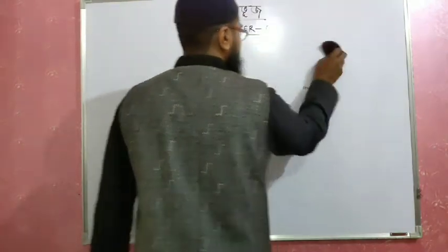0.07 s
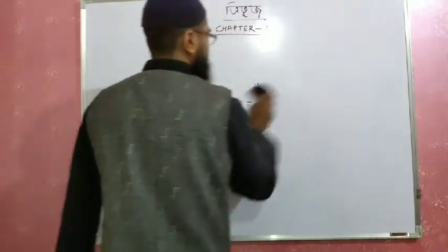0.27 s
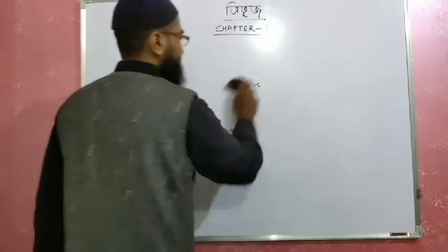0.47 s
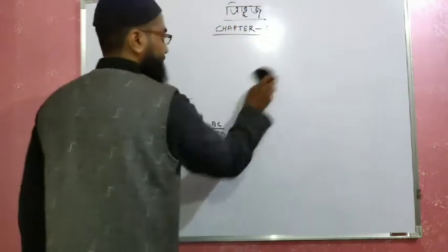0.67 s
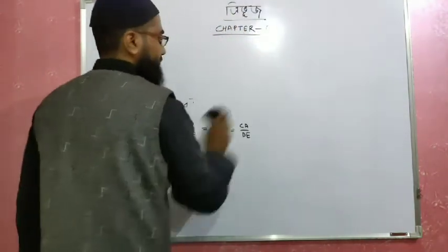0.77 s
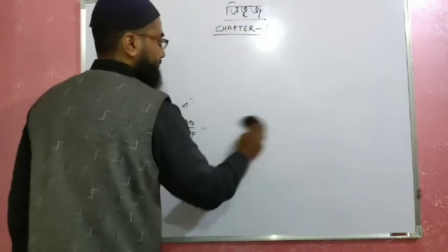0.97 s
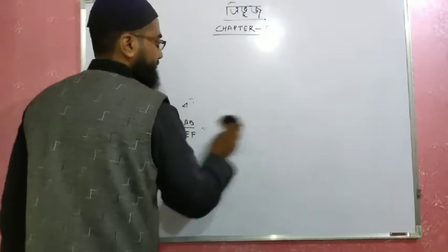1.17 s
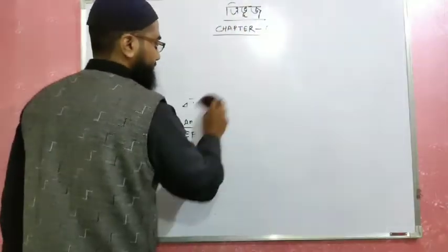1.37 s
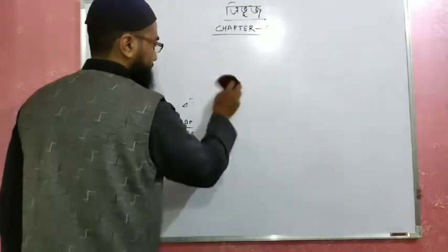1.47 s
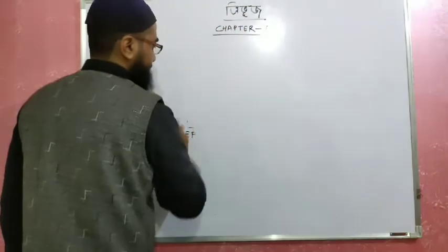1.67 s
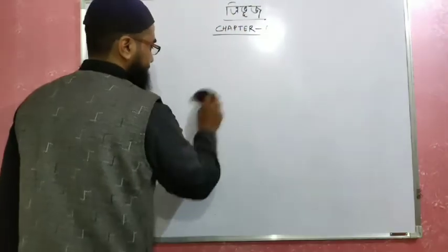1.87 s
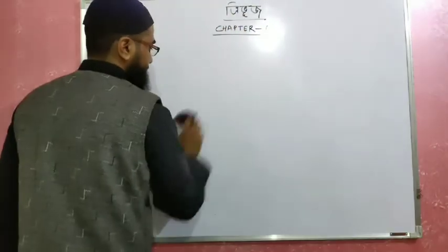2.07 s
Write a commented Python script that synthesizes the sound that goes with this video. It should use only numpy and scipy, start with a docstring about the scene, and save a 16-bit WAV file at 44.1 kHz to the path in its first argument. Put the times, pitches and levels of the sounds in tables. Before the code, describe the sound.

Brisk dry swishes of a duster on a whiteboard over low panel thuds; a sharp double knock early, strongest rub soon after, then fainter rubbing with a tiny tick, in a quiet small classroom.

```python
"""Felt duster on a whiteboard

A felt duster is swept to and fro over a wall-mounted whiteboard in a small classroom.
Coloured noise hisses with each stroke and drives the low panel modes; pulses on a modal bank knock
and chatter, most of all in the first second. Faint squeaks, two ticks and a short room tail are added.
The phone's noise suppressor passes the middle of the range only when it is strong; a faint hush remains.
"""
import sys
import numpy as np
from scipy import signal
from scipy.fft import rfft, irfft, next_fast_len
from scipy.io import wavfile
from scipy.ndimage import uniform_filter1d

SR = 44100
rng = np.random.default_rng(int(sys.argv[2]) if len(sys.argv) > 2 else 0)


def decibels_to_gain(level_db):
    """Convert a level in decibels to a linear amplitude gain (20 dB per decade)."""
    exponent = np.asarray(level_db, float) / 20
    return 10 ** exponent


def materialize(psi):
    """Save the field psi as 16-bit PCM at rate SR to the path in sys.argv[1].

    A 1-D psi becomes a single channel; in a 2-D psi each row is a channel.
    """
    bounded = np.clip(np.atleast_2d(psi).T, -1, 1)
    quanta = np.round(bounded * 32767).astype(np.int16)
    wavfile.write(sys.argv[1], SR, quanta)


N = 93271


def col(table, k):
    """Column k of a table."""
    return np.array(table, float)[:, k]


def curve(table, k):
    """Column k interpolated over time, one value per sample."""
    return np.interp(np.arange(N) / SR, col(table, 0), col(table, k))


def unit(x):
    """Scale to unit rms."""
    return x / np.sqrt(np.mean(x ** 2))


def noise():
    """White noise of the scene's length."""
    return rng.standard_normal(N)


def smooth(x, size):
    """Two moving averages in cascade."""
    return uniform_filter1d(uniform_filter1d(x, size), size)


def butter(x, order, hz, kind):
    """Causal Butterworth filter."""
    return signal.sosfilt(signal.butter(order, hz, kind, fs=SR, output="sos"), x)


def on_hz(table, hz):
    """Spectrum table interpolated on log frequency."""
    return np.interp(np.log(hz + 1), np.log(col(table, 0)), col(table, 1))


def colour(x, table):
    """Shape a signal by a (frequency [Hz], level [dB]) spectrum."""
    n = next_fast_len(N)
    hz = np.arange(n // 2 + 1) * SR / n
    return irfft(rfft(x, n) * decibels_to_gain(on_hz(table, hz)), n)[:N]


def mode(x, hz, t60_s):
    """One ringing mode: two-pole resonator, peak near 1 for a unit impulse."""
    r, w = np.exp(-np.log(1000) / (t60_s * SR)), 2 * np.pi * hz / SR
    return signal.lfilter([0, np.sin(w)], [1, -2 * r * np.cos(w), r * r], x)


def walk(rate_hz):
    """Random levels held 1 / rate_hz and slewed twice."""
    k = int(SR / rate_hz)
    held = np.repeat(rng.standard_normal(N // k + 1), k)
    return 1.26 * smooth(held, k)[:N]


def slips(rate_hz, spread_db):
    """Dense random slips of uneven size, unit rms."""
    u = rng.random((2, N))
    size = rng.standard_normal(N) * decibels_to_gain(-spread_db * np.log(u[1] + 1e-9))
    return unit((u[0] < rate_hz / SR) * size)


# strokes: (time [s], hiss level [dB], extra 2.56-5.83 kHz [dB], extra below 2.56 kHz [dB])
STROKES = [(0, -53.5, 3.5, 2.5), (.06, -51.5, 2.5, 2.5), (.15, -60, 4.5, 6.5), (.22, -55.5, -2.5, 0.5),
           (.28, -50, -2.5, -1), (.33, -50.5, 1, 5), (.39, -53, 1.5, 3), (.445, -57, 0, 4.5),
           (.5, -49.5, 5.5, 8), (.58, -43.5, 4, 1.5), (.68, -40, 4, 4), (.8, -48.5, 6, 6),
           (.92, -56.5, 4.5, 8), (1.02, -51.5, -1.5, 1), (1.11, -61.5, 2, 12), (1.165, -58, -8, 2.5),
           (1.195, -51.5, 1, -3.5), (1.28, -53.5, 0, 1), (1.34, -57, -0.5, 4), (1.45, -52, -0.5, -7.5),
           (1.53, -60, 2.5, 1.5), (1.6, -53, 0.5, -8), (1.68, -53, 3, -3), (1.78, -57, 3, 2),
           (1.85, -53.5, 1.5, -19), (1.89, -53, 2, -4), (1.95, -54.5, 3, -2), (2.01, -61, 3.5, 6),
           (2.055, -57, -0.5, -1.5), (2.09, -54.5, 3, 0.5)]
# hiss spectrum: (frequency [Hz], relative density [dB per Hz])
FELT_SPECTRUM = [(500, -37), (900, -11.5), (1200, -10.5), (1420, -7), (1880, -8), (2480, -5.5),
                 (2980, -8.5), (3940, -5), (4830, -3), (6170, 0.5), (9000, -5), (11900, -7), (15500, -12.5)]
# broad rings in the hiss: (frequency [Hz], level re hiss [dB])
STREAKS = [(2080, -22.5), (2450, -24), (3250, -28), (3750, -33), (4250, -19.5)]


def felt():
    """Fibres slipping on the glossy face; the lower hiss changes with the pressure."""
    fibres_per_s, spread_db, streak_t60_s = 9000, 0.5, 0.02
    low_split_hz, mid_split_hz = 2560, 5830
    hiss = unit(colour(slips(fibres_per_s, spread_db) + 1.4 * noise(), FELT_SPECTRUM))
    streaks = 0
    for hz, db in STREAKS:
        streaks = streaks + decibels_to_gain(db + 2.84 * walk(16)) * unit(mode(noise(), hz, streak_t60_s))
    hiss = hiss + streaks
    hiss = hiss / np.std(butter(hiss, 4, 5000, "high"))  # level refers to the treble

    def below(hz):
        return signal.sosfiltfilt(signal.butter(4, hz, fs=SR, output="sos"), hiss)

    low, low_mid = below(low_split_hz), below(mid_split_hz)
    treble, mid = hiss - low_mid, low_mid - low
    parts = treble + mid * decibels_to_gain(curve(STROKES, 2)) + low * decibels_to_gain(curve(STROKES, 3))
    return decibels_to_gain(curve(STROKES, 1) + 0.94 * walk(29.42)) * parts


# rubbing on the panel: (time [s], drumming level [dB], favoured pitch [Hz])
DRUMMING = [(0, -39.5, 106), (.09, -49, 80.4), (.13, -45.5, 87), (.25, -43.5, 97), (.282, -54, 94),
            (.297, -41.5, 102.8), (.37, -42.5, 149), (.49, -50, 143), (.56, -46, 132), (.66, -50, 129),
            (.73, -45.5, 136), (.79, -46.5, 142), (.81, -51, 143), (.86, -56.5, 160), (.89, -46, 154),
            (.93, -41, 180), (.96, -52, 180), (1.01, -47, 164), (1.1, -64.5, 132), (1.16, -53, 153),
            (1.2, -48, 146), (1.24, -54, 136), (1.33, -58.5, 150), (1.405, -48.5, 137), (1.432, -63, 137),
            (1.46, -46, 145), (1.52, -51.5, 139), (1.58, -58, 158), (1.63, -51, 160), (1.7, -61.5, 165),
            (1.725, -54, 165), (1.82, -65.5, 118), (1.9, -58, 140), (2.11, -63.5, 130)]
# lowest panel modes: (frequency [Hz], relative level [dB], t60 [s])
LOW_MODES = [(89.7, 1, 0.25), (103.5, -2, 0.1), (122, -2.5, 0.16), (141.9, 0, 0.15), (163.3, 0, 0.1),
             (195.4, 0, 0.15), (209.8, -7.5, 0.16), (238, -26, 0.23)]


def drumming():
    """The rubbing shakes the lowest modes; where the duster presses decides which speak."""
    favour_db_per_oct2, shift_db, steady_exponent, rumble_db = 20, 2, 0.4, -66.5
    centre_hz, out, power = curve(DRUMMING, 2), 0, 0
    for hz, db, t60_s in LOW_MODES:
        gain = decibels_to_gain(db - favour_db_per_oct2 * np.log2(hz / centre_hz) ** 2)
        out = out + gain * decibels_to_gain(shift_db * walk(19.96)) * unit(mode(noise(), hz, t60_s))
        power = power + gain ** 2
    out = out / np.sqrt(power)
    out = out / smooth(out ** 2, 1500) ** steady_exponent  # the even push of the hand holds the level
    out = butter(out, 2, (68, 265), "band")
    rumble = decibels_to_gain(rumble_db) * unit(mode(noise(), 44, 1.7))
    return unit(out) * decibels_to_gain(curve(DRUMMING, 1)) + rumble


# panel modes: (frequency [Hz], level [dB], undamped t60 [s])
PANEL = [(106, -4, 0.098), (188, 7, 0.12), (270.6, -11, 0.29), (343, -18, 0.16), (419.4, -4.5, 0.093),
         (422.6, -3.5, 0.25), (455, -2, 0.16), (545, -13.5, 0.2), (607, -1, 0.05), (682, -1.5, 0.047),
         (797, 3, 0.027), (955, -1, 0.036), (1026, -5, 0.064), (1264, -0.5, 0.031), (1413, -3, 0.027),
         (1650, -7, 0.066)]


def ring_panel(drive, max_t60_s):
    """Modal bank of the panel, one drive per mode, alternating signs, ring time capped."""
    out = 0
    for k, (hz, db, t60_s) in enumerate(PANEL):
        out = out + (-1) ** k * decibels_to_gain(db) * mode(drive[k], hz, min(t60_s, max_t60_s))
    return out


# knocks of the block: (time [s], strength [dB], push length [ms], crack re strength [dB], favoured pitch [Hz])
KNOCKS = [(.006, -40.5, 1, -23, 620), (0.2922, -26.5, 0.76, -11, 423), (0.2997, -25.5, 0.49, -20, 800),
          (.317, -35, 0.64, -32, 455), (.407, -42, 0.42, -12, 677), (.5045, -30.5, 0.19, -9, 795),
          (0.61, -34.5, 0.44, -18, 890), (.700, -33, 0.77, -24, 455), (0.921, -43, 0.37, -12, 1390)]


def knocks():
    """Half-sine pushes with grainy after-contact ring the panel; each spot favours other modes."""
    favour_db_per_oct2, bounce_db, bounce_s, crack_decay_s = 12.5, -17, 0.019, 0.0026
    push, crack = np.zeros((len(PANEL), N)), np.zeros(N)
    tau = np.arange(int(0.04 * SR)) / SR
    n = len(tau)
    for s, db, ms, crack_db, centre_hz in KNOCKS:
        i = int(s * SR)
        spot = decibels_to_gain(db - favour_db_per_oct2 * np.log2(col(PANEL, 0) / centre_hz) ** 2)
        bounce = decibels_to_gain(bounce_db) * np.exp(-tau / bounce_s) * rng.standard_normal(n) / np.sqrt(SR / 1000)
        contact = (tau == 0) + bounce
        half_sine = np.sin(np.pi * np.minimum(tau / ms * 1000, 1))
        force = np.convolve(contact, half_sine)[:n] / (ms * SR / 1000)
        push[:, i:i + n] += np.outer(spot, force)
        crack[i:i + n] += decibels_to_gain(db + crack_db) * np.exp(-tau / crack_decay_s) * rng.standard_normal(n)
    crack = butter(crack, 6, 3900, "high")
    out = ring_panel(push, 1)
    for gain, hz, t60_s in ((0.19, 4660, 0.0049), (0.22, 5530, 0.0087), (0.51, 8200, 0.0014)):
        out = out + gain * mode(crack, hz, t60_s)
    return out


# chatter of the block on the panel: (time [s], level [dB])
CHATTER = [(0, -47.5), (.06, -61), (.12, -61.5), (.16, -97), (.285, -79), (.31, -48), (.45, -51.5),
           (.49, -59), (.53, -45.5), (.59, -56), (.625, -51.5), (.675, -63), (.72, -46), (.79, -61.5),
           (.85, -65), (.89, -94), (1.0, -101)]


def chatter():
    """Dense small slips of the block ring the hand-damped panel modes above 300 Hz."""
    slips_per_s, spread_db, hand_t60_s, tilt_db_per_oct = 2500, 1.5, 0.05, -8
    hz = col(PANEL, 0)
    weight = (hz > 300) * decibels_to_gain(tilt_db_per_oct * np.log2(np.maximum(hz / 800, 1)))
    rattle = slips(slips_per_s, spread_db) * weight[:, None]
    rung = ring_panel(decibels_to_gain(curve(CHATTER, 1)) * rattle, hand_t60_s)
    return rung / np.std(ring_panel(rattle, hand_t60_s))


# faint squeaks of the felt: (time [s], length [s], pitch [Hz], level [dB])
SQUEAKS = [(0.221, 0.052, 800, -59), (0.881, 0.019, 940, -58), (0.922, 0.034, 950, -56),
           (0.926, 0.041, 1290, -60), (1.005, 0.1, 915, -56.5)]


def squeaks():
    """Fixed-pitch sines, each with a narrow noise band at its pitch for breath."""
    breath_ratio, breath_t60_s = 0.7, 0.022
    t, out = np.arange(N) / SR, np.zeros(N)
    for s, length_s, hz, db in SQUEAKS:
        u = np.clip((t - s) / length_s, 0, 1)
        envelope = decibels_to_gain(db) * u ** 0.069 * (1 - u) ** 0.67
        breath = unit(mode(mode(noise(), hz, breath_t60_s), hz, breath_t60_s))
        out += envelope * (np.sin(2 * np.pi * hz * t) + breath_ratio * breath)
    return out


# tiny ticks: (time [s], drive level [dB], lower ring gain [dB])
TICKS = [(.4946, -31, -12), (1.3012, -26.5, 0)]


def ticks():
    """Four-sample pulses ring two short high modes."""
    high_hz, low_hz, t60_s = 11600, 6300, 0.0023
    out = np.zeros(N)
    for s, db, low_db in TICKS:
        i, hit = int(s * SR), np.zeros(N)
        hit[i:i + 4] = decibels_to_gain(db) * np.array([-0.5, 0.5, 0.5, -0.5])
        out += 0.5 * mode(hit, high_hz, t60_s) + decibels_to_gain(low_db) * mode(hit, low_hz, t60_s)
    return out


def room(hits):
    """Classroom tail: convolution with exponentially decaying noise after a 6 ms gap."""
    level_db, t60_s = -10, 0.47
    tau = np.arange(int(0.5 * SR)) / SR
    tail = rng.standard_normal(len(tau)) * np.exp(-np.log(1000) * tau / t60_s) * (tau > 0.006)
    return decibels_to_gain(level_db) * signal.fftconvolve(hits, tail / np.sqrt(np.sum(tail ** 2)))[:N]


def scene():
    """Duster and panel, with a room tail on knocks and chatter; two equal channels."""
    hits = knocks() + chatter()
    wet = room(hits)
    mono = felt() + drumming() + hits + wet + squeaks() + ticks()
    return np.array([mono, mono])


# suppressor threshold: (frequency [Hz], density [dB per Hz])
GATE = [(30, -140), (260, -120), (400, -100), (1000, -90.5), (1800, -90), (2500, -96.5), (3200, -97.5),
        (4200, -94.5), (4700, -95.5), (5300, -101), (6200, -112), (16000, -130)]


def suppress(x):
    """Noise suppressor: ducks every STFT bin whose smoothed power falls under its threshold."""
    depth_db, steepness = -26, 2.3
    hz, _, z = signal.stft(x, SR, nperseg=1024, noverlap=768)
    power = uniform_filter1d(np.abs(z) ** 2, size=2, axis=0)
    power = uniform_filter1d(power, size=8, axis=1) / (1.5 * SR / 1024)  # per Hz
    ratio = (power / decibels_to_gain(2 * on_hz(GATE, hz))[:, None]) ** steepness
    gain = decibels_to_gain(depth_db) + (1 - decibels_to_gain(depth_db)) * ratio / (1 + ratio)
    return signal.istft(z * gain, SR, nperseg=1024, noverlap=768)[1][:N]


# hush spectrum: (frequency [Hz], relative density [dB per Hz])
HUSH = [(30, -37), (200, 2), (500, -5.5), (1000, -7), (1700, -16), (3000, -25.5), (5000, -4), (15000, -20)]


def hush():
    """Steady faint coloured noise."""
    level_db = -72.5
    return decibels_to_gain(level_db) * unit(colour(noise(), HUSH))


def roll_off(x):
    """The treble ends steeply here."""
    return signal.sosfilt(signal.butter(12, 16440, fs=SR, output="sos"), x)


def record(dry):
    """Suppressor, added hush, then band limits at 40 Hz and 15.45 kHz."""
    x = suppress(dry[0]) + hush()
    x = butter(x, 4, 40, "high")
    x = signal.sosfilt(signal.ellip(8, 0.2, 70, 15450, fs=SR, output="sos"), x)
    return roll_off(np.array([x, x]))


dry = scene()
out = record(dry)
materialize(out)
```